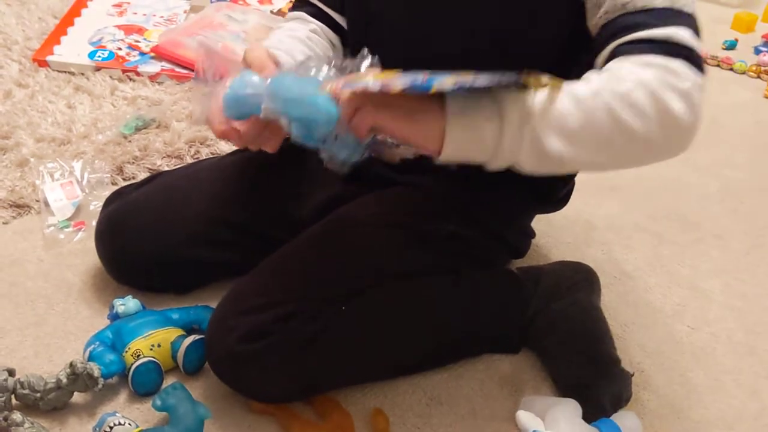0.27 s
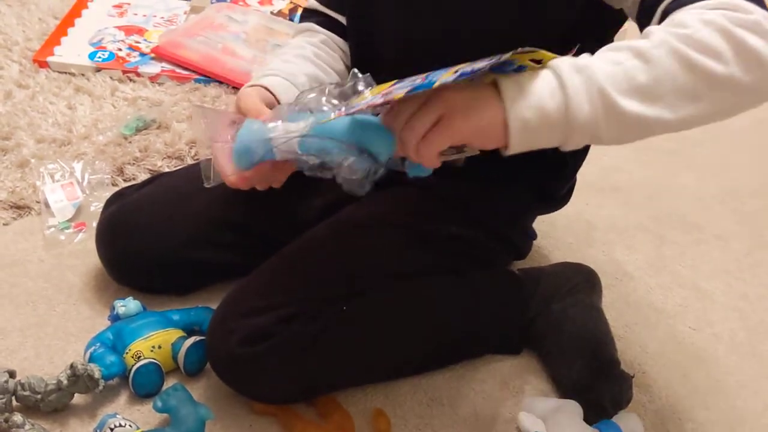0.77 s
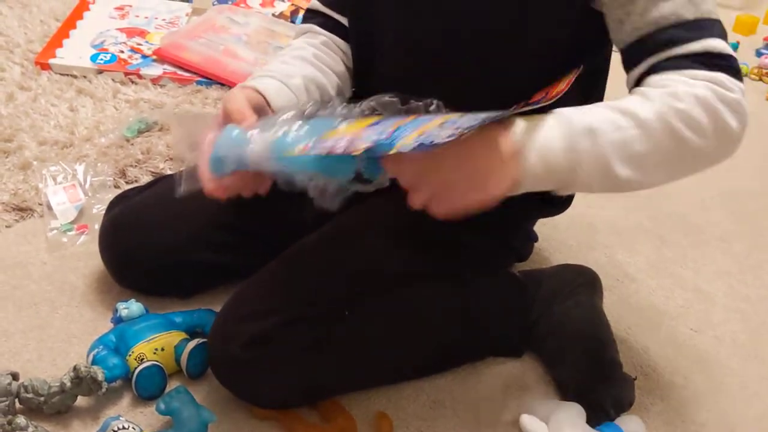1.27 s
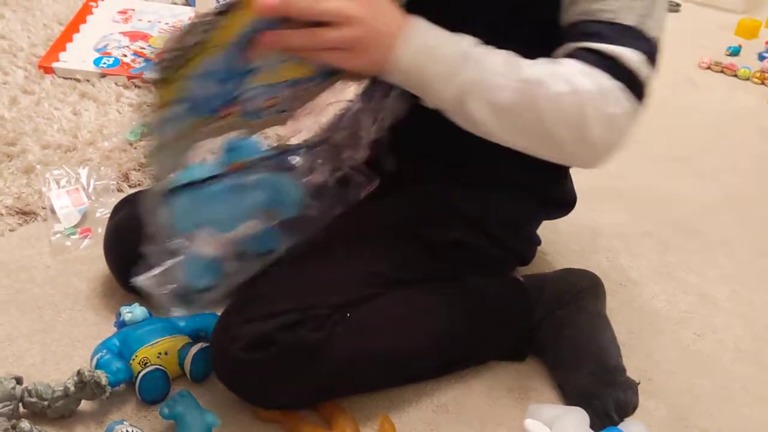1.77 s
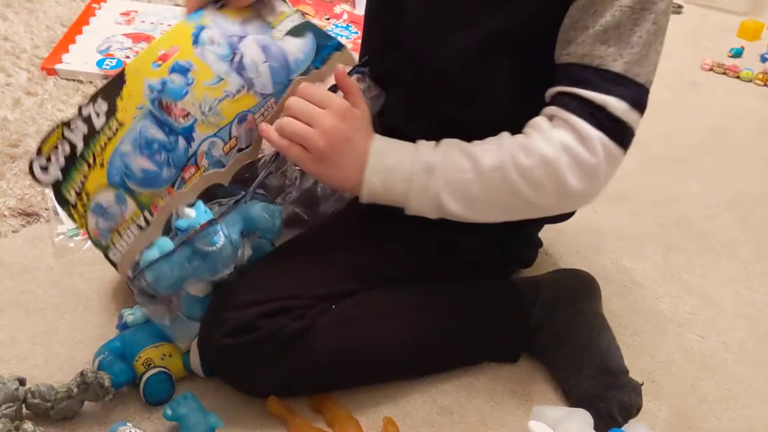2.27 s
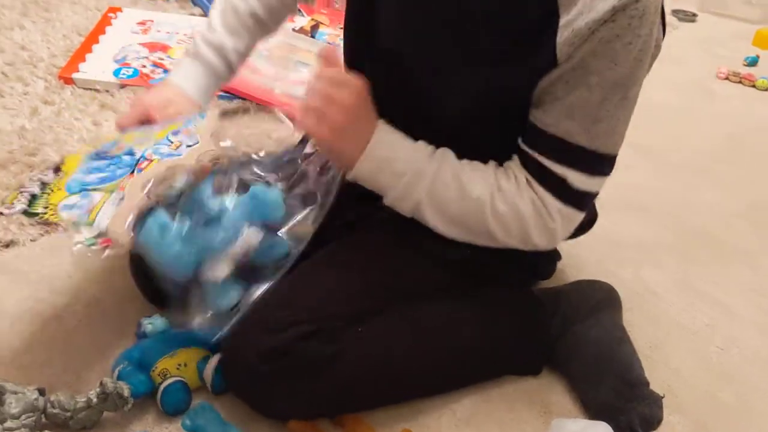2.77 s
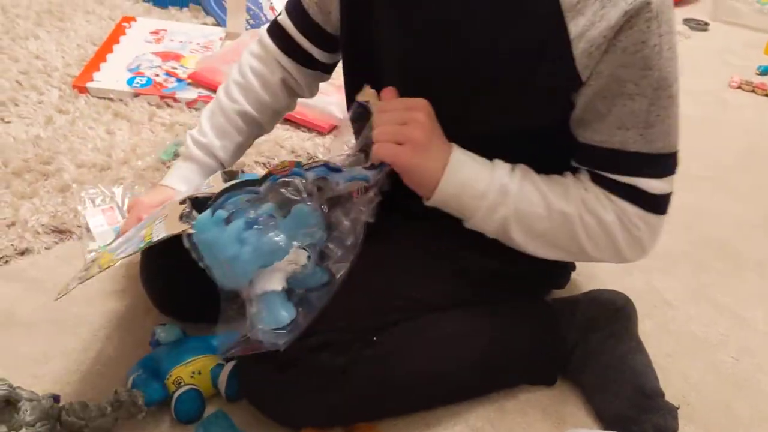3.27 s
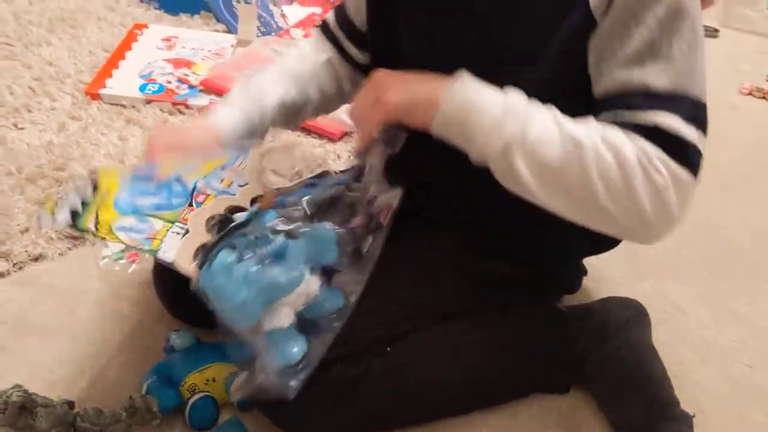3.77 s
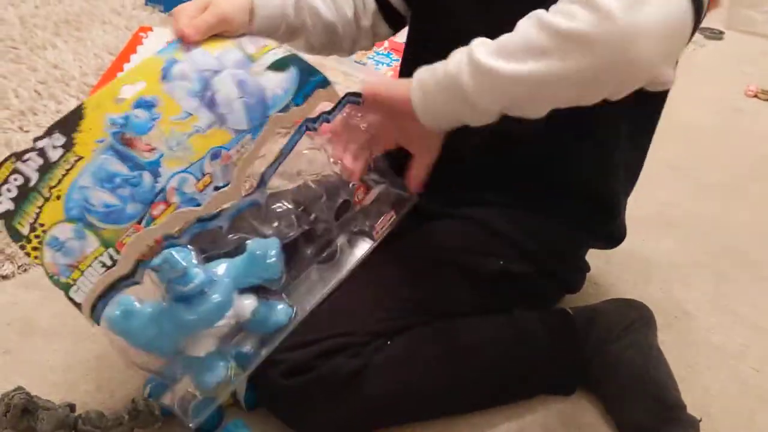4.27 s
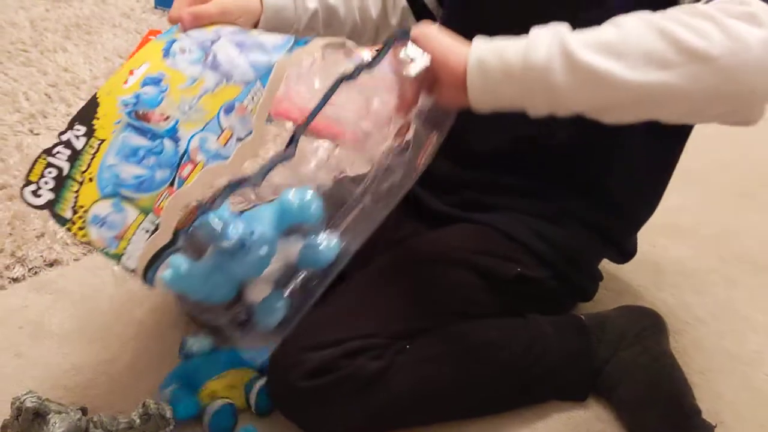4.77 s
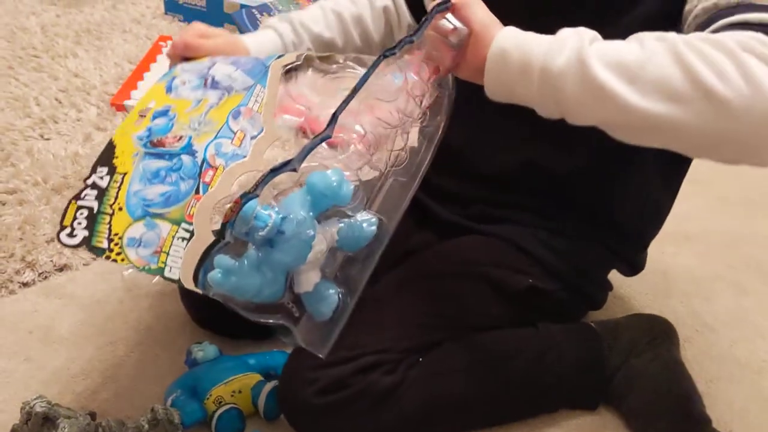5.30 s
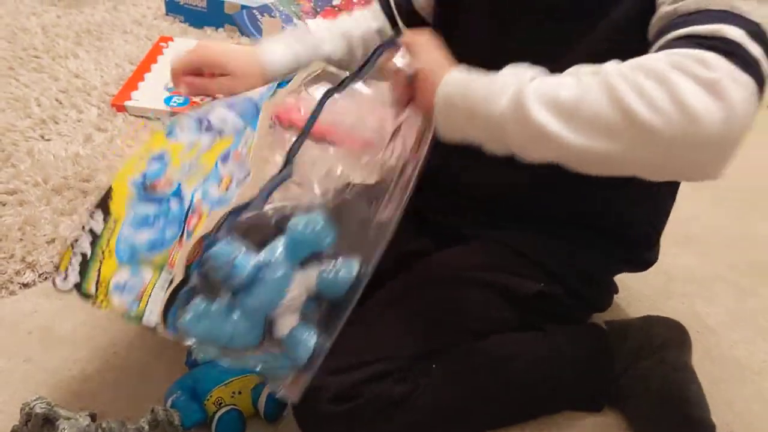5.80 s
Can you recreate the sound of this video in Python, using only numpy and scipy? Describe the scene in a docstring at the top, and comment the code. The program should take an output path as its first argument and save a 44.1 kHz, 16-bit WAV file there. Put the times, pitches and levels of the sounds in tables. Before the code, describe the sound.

A child pulls cardboard from a hard plastic toy pack indoors: irregular sharp cracks, film rustle, low thumps, then short ratcheting creaks.

```python
"""Peeling a blister pack

A child on a living-room carpet pulls the card backing off a stiff clear plastic shell.
The shell buckles in snaps and pops (dispersive pulses plus ringing), scrapes, and creaks in stick and slip.
Card fibres rip and rub (random catches over hiss); the pack bumps on the knees (damped low sines) and the
body rustles (lumpy low noise). A short room tail follows snaps, scrapes, bumps and creaks."""
import sys
import numpy as np
from scipy import signal
from scipy.fft import rfft, irfft, next_fast_len
from scipy.io import wavfile
from scipy.ndimage import uniform_filter1d, minimum_filter1d

SR = 44100
rng = np.random.default_rng(int(sys.argv[2]) if len(sys.argv) > 2 else 0)


def master_out(mix):
    """Clip the mix to full scale and print it as 16-bit PCM to the path in sys.argv[1]."""
    frames = np.transpose(np.atleast_2d(mix))
    ceiling = np.clip(frames, -1, 1)
    pcm = np.round(ceiling * 32767).astype(np.int16)
    wavfile.write(sys.argv[1], SR, pcm)


N = 266364

# work of the hands on card and shell: t/s, relative level/dB
EFFORT = [(0.0, -56), (0.26, -70.5), (0.52, -73), (1.0, -67), (1.14, -54), (1.38, -61), (1.95, -52),
          (2.5, -61.5), (2.86, -49.5), (3.12, -64.5), (3.45, -65.5), (3.95, -51.5), (4.22, -59),
          (4.56, -59.5), (5.2, -58), (5.58, -58.5), (5.7, -57.5), (6.04, -64)]
# boom of the hollow shell: f/Hz, relative level/dB
HOLLOW = [(120, -6.5), (230, -8), (350, -2), (500, -1.5), (620, -1.5), (720, -1.5), (950, -43)]
# resonance of the flat panels: f/Hz, relative level/dB
PANEL = [(500, -38), (720, -3.5), (1020, 7), (1220, 0.5), (1420, 4), (1850, -5.5), (2500, -34)]
# sharp top of cracks and fibres: f/Hz, relative level/dB
CRACK = [(5000, -48), (7200, -9), (8800, -3), (10500, -1.5), (13000, -1), (16000, -12)]


def from_db(db):
    """Amplitude ratio from dB."""
    return 10 ** (np.asarray(db) / 20)


def rms_one(x):
    """Scale to rms 1."""
    return x / np.sqrt(np.mean(x ** 2) + 1e-20)


def in_time(rows):
    """Each column of a curve, sample by sample."""
    s, *columns = np.transpose(rows)
    return [np.interp(np.arange(N) / SR, s, column) for column in columns]


def at_hz(points, hz):
    """A spectrum read on a log-frequency axis."""
    f, value = np.transpose(points)
    return np.interp(np.log(np.maximum(hz, 1)), np.log(f), value)


def resonance(spectrum, size=2048):
    """Causal (minimum-phase) impulse response of a spectrum, falling 18 dB/octave, 40 dB at most, outside it."""
    hz = np.maximum(np.fft.rfftfreq(size, 1 / SR), 5)
    octaves_outside = np.abs(np.log2(hz / np.clip(hz, spectrum[0][0], spectrum[-1][0])))
    db = at_hz(spectrum, hz) - np.minimum(18 * octaves_outside, 40)
    # fold the cepstrum onto positive time
    cepstrum = irfft(np.log(from_db(db)))
    cepstrum[1:size // 2] *= 2
    cepstrum[size // 2 + 1:] = 0
    return irfft(np.exp(rfft(cepstrum)))


def through(x, response):
    """Convolve, keeping the length."""
    return signal.fftconvolve(np.atleast_2d(x), np.atleast_2d(response), axes=1)[:, :x.shape[-1]]


def widen(pair, correlation):
    """Mid and side from two unrelated signals: left and right of the given correlation if equally strong."""
    c = np.clip(correlation, 0, 1)
    side = np.sqrt((1 - c) / (1 + c)) * pair[1]
    return pair[0] + side * np.array([[1], [-1]])


def add(out, s, sound):
    """Mix a sound in at time s."""
    i = int(np.clip(round(s * SR), 0, N - 1))
    out[:, i:i + sound.shape[-1]] += sound[..., :N - i]


def burst_level(x, span_s=0.0049):
    """Scale a burst as if all its energy came within span_s at rms 1."""
    energy = np.sum(x.mean(axis=0) ** 2)
    return x / np.sqrt(energy / (span_s * SR) + 1e-20)


def room(x, first_s=0.0062, wall_s=0.018, wall_db=6.0, swell_s=0.0019):
    """Reflections start after a few ms, swell briefly off the nearest wall and die band by band."""
    # decay: f/Hz, T60/s
    room_t60 = [(200, 0.35), (530, 0.25), (1400, 0.19), (3700, 0.28), (10000, 0.26), (16000, 0.089)]
    # square root of left-right correlation: f/Hz, value
    root_correlation = [(100, 0.99), (500, 0.96), (1200, 0.46), (3000, 0.33), (8000, 0.13), (16000, 0.067)]
    t = np.arange(SR // 2) / SR
    hz = np.fft.rfftfreq(len(t), 1 / SR)
    white = rfft(rng.standard_normal((2, len(t))))
    tail = 0
    for k, (_, t60) in enumerate(room_t60):
        share = at_hz([(f, j == k) for j, (f, _) in enumerate(room_t60)], hz)
        tail = tail + irfft(white * share, len(t)) * from_db(-60 * t / t60)
    wall_swell_db = wall_db * np.exp(-((t - wall_s) / swell_s) ** 2)
    tail = tail * (t > first_s) * from_db(wall_swell_db)
    tail = irfft(widen(rfft(tail), at_hz(root_correlation, hz) ** 2), len(t))
    return through(x, tail / np.sqrt(np.sum(tail.mean(axis=0) ** 2)))


def friction(spectrum, correlation, catches_per_s, spread_db, smooth_db):
    """Tiny catches and breaking fibres over a smooth sliding hiss drive a resonance; rms 1."""
    strength = from_db(spread_db * np.minimum(rng.exponential(1, N), 4))
    catches = (rng.random(N) < catches_per_s / SR) * strength
    drive = rms_one(catches * rng.standard_normal((2, N)))
    drive = drive + from_db(smooth_db) * rng.standard_normal((2, N))
    return rms_one(through(widen(drive, correlation), resonance(spectrum)))


def rubbing(hollow_db=-2.5, panel_db=0.5, slide_db=-2.0, crack_db=-9.5, treble_follows=0.48):
    """The card peels and shifts against the shell throughout; treble follows the effort less than the body does."""
    # plastic sliding on plastic: f/Hz, relative level/dB
    slide = [(1400, -16), (2100, 0), (2900, -2), (3800, -5), (5200, -8), (7400, -19), (9500, -20),
             (11800, -27), (13500, -41), (16000, -31)]
    effort_db, = in_time(EFFORT)
    treble_db = effort_db.mean() + treble_follows * (effort_db - effort_db.mean())
    low = friction(HOLLOW, 0.83, catches_per_s=150, spread_db=6.5, smooth_db=-2.5)
    middle = friction(PANEL, 0.6, catches_per_s=170, spread_db=5.5, smooth_db=1.5)
    high = friction(slide, 0.2, catches_per_s=1100, spread_db=6.0, smooth_db=5.0)
    top = friction(CRACK, 0.24, catches_per_s=820, spread_db=-3.0, smooth_db=2)
    body = from_db(effort_db + hollow_db) * low + from_db(effort_db + panel_db) * middle
    return body + from_db(treble_db + slide_db) * high + from_db(treble_db + crack_db) * top


def shifting(level_db=2.0, lumps_db=3.5, lumps_per_s=14):
    """Low, lumpy rustle of the body moving on the carpet."""
    # arms and knees shift: t/s, relative level/dB
    movement = [(0.0, -64), (1.09, -70.5), (1.41, -57.5), (1.63, -63), (1.93, -56), (2.09, -58),
                (2.45, -63), (2.69, -71), (2.86, -67), (3.06, -71), (3.83, -79), (4.19, -66.5), (4.53, -59),
                (4.76, -59.5), (4.95, -69), (5.32, -66), (5.92, -72), (6.04, -69)]
    # rustle spectrum: f/Hz, relative level/dB
    rumble = [(15, -19), (42, 1), (75, -1.5), (115, -6), (155, -3), (210, -14.5), (330, -42)]
    noise = through(widen(rng.standard_normal((2, N)), 0.98), resonance(rumble, size=8192))
    lumps = np.interp(np.arange(N) / SR * lumps_per_s, np.arange(1000), rng.standard_normal(1000))
    return from_db(level_db + in_time(movement)[0] + lumps_db * lumps) * rms_one(noise)


def bending_pulse(travel_s, size=1024):
    """A kick after crossing a thin sheet: delay goes as 1 / sqrt(f), travel_s at 1 kHz."""
    khz = np.fft.rfftfreq(size, 1 / SR) / 1000
    pulse = irfft(np.exp(-4j * np.pi * 1000 * travel_s * np.sqrt(khz)))
    return np.pad(pulse[:size // 2], (0, SR // 10 - size // 2))


def flip(travel_s, scatter_db, t60, correlation):
    """A bending pulse with scattered returns that spread out over the sheet."""
    t = np.arange(SR // 10) / SR
    centre, edges = rng.standard_normal((2, len(t))) * from_db(-60 * t / t60)
    returns = widen([centre, edges * (1 - np.exp(-t / .002))], correlation)
    return bending_pulse(travel_s) + from_db(scatter_db) * returns / np.linalg.norm(centre)


def snaps(rows, ring_t60=0.024, ring_db=1.5, travel_s=0.0005995, scatter_db=9.5, positions=3):
    """A panel flips and rings for a few ms at its own pitch; the duller the flip, the more its high parts lose."""
    # sharp fold in the shell: f/Hz, relative level/dB
    crease = [(1400, -25.5), (1950, 5), (2300, 5), (3200, 0), (3800, -6), (4400, -13), (5600, -38.5)]
    # stiff rim of the shell: f/Hz, relative level/dB
    rim = [(3000, -14), (4100, 5), (5200, -0.5), (6300, -1), (7400, -13.5), (10000, -31)]
    # hollow, panel, crease, rim, crack: T60/s, correlation of returns, relative level/dB,
    # room re direct/dB, share of the dullness lost
    parts = [(0.044, 0.9, -0.5, -6.5, 0.019), (0.02, 0.64, -2, -11, 0.004), (0.017, 0.26, 2.5, -11.5, 0.38),
             (0.019, 0.37, 4.5, -12, 0.74), (0.018, 1, 3, -12, 0.85)]
    crease_from_hz, crease_lead_db = 1900, 7   # higher snaps start in a crease, which sounds stronger
    # creases sound even in a dull pop, and more so the harder it is
    crease_most_loss_db, crease_db_per_db, usual_snap_db = 18, 0.1056, -25
    t = np.arange(SR // 10) / SR
    direct, to_room = np.zeros((2, N)), np.zeros((positions, 1, N))
    for spectrum, part in zip((HOLLOW, PANEL, crease, rim, CRACK), parts):
        t60, correlation, part_db, room_db, dull_share = part
        response = resonance(spectrum)
        radiated = burst_level(through(bending_pulse(travel_s), response))
        for i, (s, hz, db, dull_db, hollow_db) in enumerate(rows):
            sound = burst_level(through(flip(travel_s, scatter_db, t60, correlation), response))
            if spectrum is (PANEL if hz < crease_from_hz else crease):
                ring = np.sin(2 * np.pi * hz * t) * from_db(-60 * t / ring_t60)
                ring *= 1 - np.exp(-t * hz)
                ring *= np.sign(ring @ sound[0])   # the ring swings with the blow
                sound = burst_level(sound + from_db(ring_db) * burst_level(ring[None]))
            loss_db = dull_share * dull_db
            if spectrum is crease:
                loss_db = min(loss_db, crease_most_loss_db) - crease_db_per_db * (db - usual_snap_db)
                loss_db -= crease_lead_db * (hz >= crease_from_hz)
            boom_db = hollow_db if spectrum is HOLLOW else 0
            force = from_db(db + part_db - loss_db + boom_db)
            add(direct, s, force * sound)
            add(to_room[i % positions], s, force * from_db(room_db) * radiated)
    return direct + sum(room(position) for position in to_room)


def ticks(per_s=5, above_effort_db=7.5, spread_db=4, centre_hz=1300, dullness_db=30, hollow_db=-7):
    """Rows for snaps(): faint buckles at random moments, stronger as the hands work harder."""
    draws = rng.random((int(per_s * N / SR), 4))
    s = draws[:, 0] * N / SR
    pitch, force, dull = 2 * draws[:, 1:].T - 1   # each -1 to 1
    hz = centre_hz * 2 ** (pitch / 2)
    db = np.interp(s, *np.transpose(EFFORT)) + above_effort_db + spread_db * force
    return list(zip(s, hz, db, dullness_db * (1 + dull / 2), np.full(len(s), hollow_db)))


def scrapes(room_db=-13.0, attack_share=0.33, sag_db=4, release_db=30, echo_s=.00108, echo_db=-8):
    """The film slides across itself: dense bright catches swell, sag, then fade by release_db per further length."""
    # strokes: t/s, length/s, relative level/dB, film hiss gain/dB
    strokes = [(0.377, 0.094, -44.5, 0.5), (0.706, 0.086, -44.5, -3.5), (1.202, 0.071, -48, 11),
               (1.718, 0.078, -51, 4), (1.773, 0.013, -47, 2), (1.957, 0.51, -60.5, 9),
               (2.178, 0.029, -53, -26), (2.488, 0.028, -53, -6), (2.628, 0.074, -39.5, -16),
               (2.804, 0.016, -42.5, -7.5), (4.089, 0.01, -48.5, 6.5), (4.299, 0.028, -37.5, -8)]
    # thin film under a quick stroke: f/Hz, relative level/dB
    film = [(1400, -24.5), (2100, 4.5), (2800, 0), (3500, 2), (4500, -4.5), (5400, -6), (7400, -18),
            (9500, -13.5), (11900, -12), (13200, -22.5), (16000, -22)]
    body = friction(PANEL, 0.62, catches_per_s=990, spread_db=4.5, smooth_db=-1.5)
    boom = friction(HOLLOW, 0.96, catches_per_s=1700, spread_db=2.5, smooth_db=-5.0)
    body = body + from_db(-3.5) * boom
    hiss = friction(film, 1.0, catches_per_s=2000, spread_db=2.0, smooth_db=4)
    out = np.zeros((2, N))
    for s, length, db, hiss_db in strokes:
        span = slice(int(s * SR), int((s + length) * SR) + SR // 5)
        stroke = body[:, span] + from_db(hiss_db) * hiss[:, span]
        t = np.arange(stroke.shape[1]) / SR
        fall_db = sag_db * np.minimum(t / length, 1) + release_db * np.maximum(t / length - 1, 0)
        attack = np.minimum(t / (attack_share * length), 1)
        add(out, s, attack * from_db(db - fall_db) * stroke)
    add(out, echo_s, from_db(echo_db) * out)   # a bounce off the card colours the hiss in bands
    return out + from_db(room_db) * room(out.mean(axis=0))


def bumps(t60=0.055, level_db=5.5, room_db=-9.0):
    """The pack bumps on knees and hands: a few damped low cycles."""
    # blows: t/s, relative level/dB, f/Hz
    blows = [(0.497, -42.5, 145), (0.777, -34.5, 186), (1.299, -42, 164), (1.392, -46, 62),
             (1.567, -45, 197), (1.757, -45, 61), (1.793, -37, 61), (1.818, -35.5, 164), (1.939, -24, 150),
             (1.951, -34, 156), (1.967, -35, 147), (2.894, -38, 206), (4.109, -40, 109), (4.431, -45, 152),
             (5.837, -35, 129)]
    t, out = np.arange(SR // 5) / SR, np.zeros((2, N))
    fade = from_db(-60 * t / t60) * (1 - np.exp(-t / .002))
    for s, db, hz in blows:
        add(out, s, from_db(db + level_db) * np.sin(2 * np.pi * hz * t) * fade)
    return out + from_db(room_db) * room(out.mean(axis=0))


def creaks(uneven_db=3.3, travel_s=0.001587, level_db=-11.5, quickening=1.4):
    """Stick and slip: each slip sends a bending pulse; slips grow stronger and faster with the push, into a rasp."""
    # pushes: start t/s, hardest t/s, end t/s, top slip rate/Hz, relative level/dB
    pushes = [(5.206, 5.359, 5.39, 190, -26), (5.407, 5.473, 5.518, 430, -31.5),
              (5.769, 5.809, 5.832, 330, -33.5)]
    # shell under a slip: f/Hz, relative level/dB
    slip = [(200, -12.5), (500, -9.5), (800, 8), (1100, 0), (1550, 8), (2100, -5), (3200, -13.5),
            (5600, -14), (7500, -24.5), (10500, -17), (16000, -26)]
    slowing, fade_db = 2.4, 4   # at the ends of a push: rate divisor, level drop
    jitter, scatter_db, t60, room_db = .05, -5, .010, -11
    response, out = resonance(slip), np.zeros((2, N))
    for start, hardest, end, top_per_s, db in pushes:
        s = start
        while s < end:
            push = np.interp(s, [start, hardest, end], [0, 1, 0])
            force = from_db(db + level_db - fade_db * (1 - push) ** 2 + uneven_db * rng.normal())
            add(out, s, force * burst_level(through(flip(travel_s, scatter_db, t60, 0.18), response)))
            rate = max(top_per_s / slowing ** (1 - push ** quickening), 20)
            s += np.exp(jitter * (rate / 130) ** 1.5 * rng.normal()) / rate
    return out + from_db(room_db) * room(out.mean(axis=0))


def scene():
    """Everything the pack and the hands do, over the rustle of the body."""
    # shell buckles: t/s, main ring f/Hz, relative level/dB, dullness/dB, hollow boom gain/dB
    buckles = [(0.001, 1110, -37, 15, -6.5), (0.1144, 2024, -38.5, 6, -12), (0.2216, 2120, -48, 6, -8.5),
               (0.497, 2420, -44.5, 6.5, 2.5), (0.677, 920, -27, 27, -14), (0.727, 1850, -37.5, 23, -6.5),
               (0.7774, 2110, -33.5, 12.5, -5.5), (0.8275, 1510, -43.5, 26, -4), (0.886, 1460, -43, 34, -6),
               (1.1273, 970, -39.5, 28, -6), (1.1382, 2070, -31.5, 31, -7.5), (1.1556, 3070, -25, 23, -15),
               (1.2013, 1070, -35.5, 31, -6), (1.217, 2440, -34, 10.5, -7), (1.3039, 1200, -39, 23, -2),
               (1.3915, 960, -48, 22, 5.5), (1.5339, 1550, -43, 28, -3), (1.5704, 1020, -31.5, 27.5, -5.5),
               (1.829, 1480, -37.5, 55, -17), (1.938, 1390, -18, 37, -11.5), (1.9493, 1474, -15, 28, -16),
               (1.9571, 1005, -16.5, 32, -11.5), (2.0944, 1490, -38.5, 25, -19),
               (2.612, 1120, -39, 33, -3.5), (2.65, 1070, -34, 26.5, -10), (2.7068, 1270, -31.5, 51, 0),
               (2.7176, 1070, -29.5, 43, -7), (2.768, 840, -34, 47, -5), (2.8935, 945, -41.5, 34, 6.5),
               (2.8994, 1500, -31, 55, -10), (2.925, 650, -27.5, 51, -7), (2.9661, 1316, -13, 13, -12.5),
               (2.978, 1490, -27.5, 8, -6), (3.2857, 930, -32.5, 50, 0), (3.3097, 2060, -36.5, 19, -24),
               (3.3449, 1920, -37.5, 10.5, -2.5), (3.4319, 1010, -46.5, 29, -2.5),
               (3.5376, 940, -32.5, 38, -7.5), (3.6647, 950, -38.5, 36, -3), (3.725, 1400, -41, 35, -1),
               (3.7861, 1909, -14.5, 56.5, -12.5), (3.9154, 910, -35.5, 50, -9),
               (3.9535, 1420, -26.5, 33, -7), (3.975, 1280, -28, 26, -8.5), (3.9863, 1330, -34, 35, -26),
               (3.998, 1500, -31.5, 32, -10), (4.0256, 1005, -8.5, 60, -23.5),
               (4.0277, 1070, -17.5, 62, -16), (4.127, 1010, -41, 17.5, -14), (4.2465, 1000, -40, 56, -5),
               (4.3943, 870, -28.5, 35, -5), (4.4326, 880, -31.5, 36, -3.5), (4.5084, 1010, -39, 32, -9),
               (4.6103, 990, -34, 22.5, -10), (4.7045, 744, -33, 26.5, -3.5),
               (4.73, 1010, -31.5, 26.5, -6.5), (4.7669, 1300, -23, 7, -12.5),
               (4.8263, 980, -28.5, 37, -15), (4.8864, 880, -25, 46, -11), (4.9084, 700, -37, 33, -0.5),
               (5.0113, 950, -30.5, 32, -15), (5.0922, 1070, -29, 29.5, -17),
               (5.1296, 1460, -23.5, 50, -27), (5.1443, 660, -30.5, 38, -2.5), (5.5387, 652.6, -34, 34, -7),
               (5.5479, 740, -36.5, 35, -6), (5.6072, 650, -36.5, 54, -1.5), (5.714, 1030, -40.5, 25, -10),
               (5.7554, 1512, -35.5, 32, -37), (5.8364, 1143, -13.5, 39.5, -10),
               (5.8405, 960, -20, 29, -11), (5.87, 1083, -25, 31.5, -35), (5.9032, 660, -40.5, 21, 1.5),
               (5.9158, 1370, -32, 51, -27)]
    return rubbing() + shifting() + snaps(buckles + ticks()) + scrapes() + bumps() + creaks()


def limiter(x):
    """Turns the gain down for a few ms around peaks above the top level."""
    top, span = .85, SR // 300
    gain = np.minimum(1, top / (np.abs(x).max(axis=0) + 1e-9))
    return x * uniform_filter1d(minimum_filter1d(gain, span), span)


def record(dry):
    """Two microphone ports, the right a little farther away; peaks are limited, the top is cut."""
    # f/Hz, left minus right/dB
    balance = [(100, -2), (380, 0), (1300, 1), (4400, 1.1), (8000, -1.6), (15000, -3.5)]
    # f/Hz, lag of the right port/rad
    right_phase = [(100, 0.02), (500, 0.27), (1200, 0.57), (2400, 1.06), (5000, 1.35), (16000, 1.5)]
    cutoff_hz = 16300
    size = next_fast_len(N + SR // 10)
    hz = np.fft.rfftfreq(size, 1 / SR)
    lean = from_db(at_hz(balance, hz) / 2)
    ports = np.array([lean, np.exp(-1j * at_hz(right_phase, hz)) / lean])
    heard = limiter(irfft(rfft(dry, size) * ports, size)[:, :N])
    return signal.sosfilt(signal.ellip(10, .3, 80, cutoff_hz, fs=SR, output="sos"), heard)


dry = scene()
out = record(dry)
master_out(out)
```